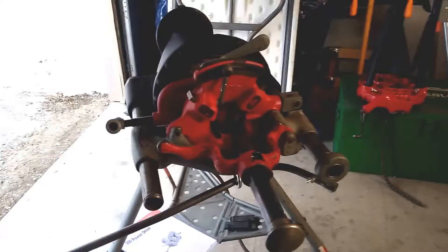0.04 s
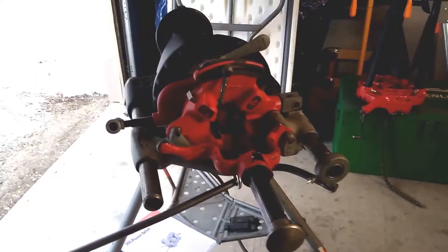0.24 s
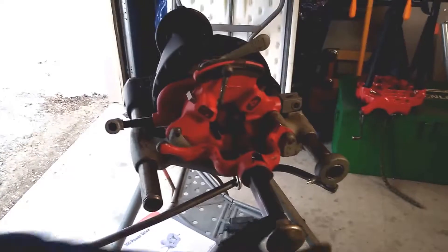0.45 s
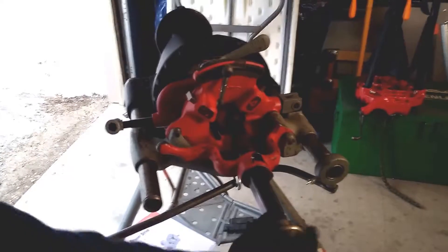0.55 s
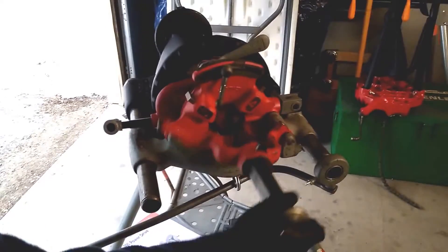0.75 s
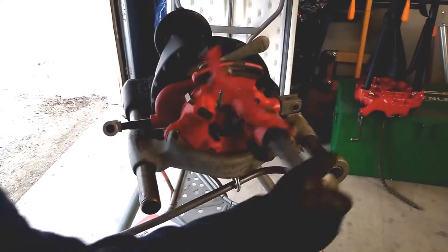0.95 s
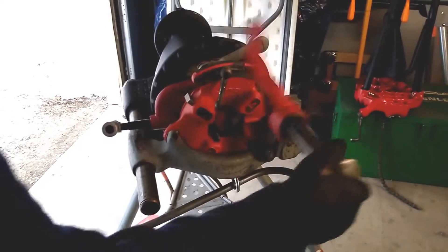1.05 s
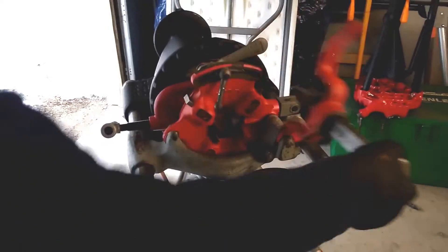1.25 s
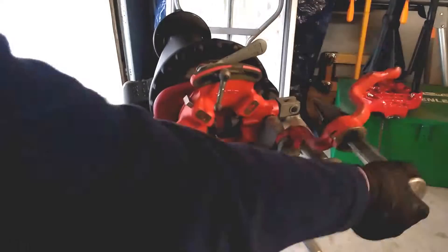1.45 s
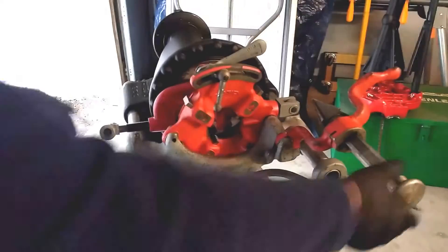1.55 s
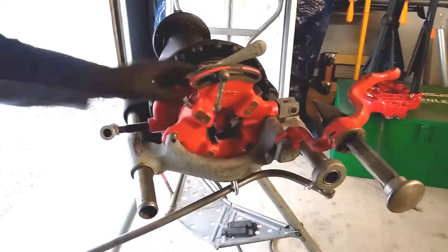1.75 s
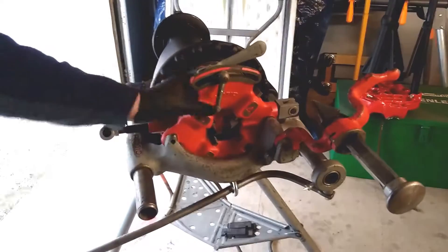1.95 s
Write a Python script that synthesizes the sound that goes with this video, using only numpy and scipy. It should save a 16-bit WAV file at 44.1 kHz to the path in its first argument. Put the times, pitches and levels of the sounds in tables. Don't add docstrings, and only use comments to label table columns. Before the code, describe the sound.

A heavy steel tool arm clanks onto its stop at 1.33 s, chattering and ringing brightly. Before it, soft far rumble and low air noise fade up, a sleeve rustles at 0.2 s, and a latch knocks open at 0.63 s, settling at 0.7 s. A quick scrape comes at 1.28 s. Loose steel ticks at 1.49 s; automatic gain ducks everything, then cloth rustles near 1.8 s in the open workshop.

```python
import sys
import numpy as np
from scipy import signal
from scipy.fft import rfft, irfft, next_fast_len
from scipy.io import wavfile

SR = 44100
rng = np.random.default_rng(int(sys.argv[2]) if len(sys.argv) > 2 else 0)


def log_audio(samples):
    frames = np.atleast_2d(samples).T
    limited = np.clip(frames, -1, 1)
    pcm = np.round(limited * 32767).astype(np.int16)
    wavfile.write(sys.argv[1], SR, pcm)


def decibels_to_gain(level_db):
    exponent = np.asarray(level_db, float) / 20
    return 10 ** exponent


N = 88200


def rms_one(x):
    return x / np.sqrt(np.mean(x ** 2) + 1e-20)


def at_hz(points, hz):
    table_hz, values = np.array(points)[:, 0], np.array(points)[:, 1]
    return np.interp(np.log(hz), np.log(table_hz), values)


def drift(rate_hz):
    r = np.exp(-80 * np.pi * rate_hz / SR)
    white = rng.standard_normal(N // 40 + 2002)
    slow = signal.lfilter([1], [1, -2 * r, r * r], white)[2000:]
    return np.interp(np.arange(N) / 40, np.arange(len(slow)), rms_one(slow))


def late(x, lag):
    size = next_fast_len(N + 256)
    turn = np.exp(-2j * np.pi * np.arange(size // 2 + 1) * lag / size)
    return irfft(rfft(x, size) * turn, size)[..., :N]


def ports(rows, directions):
    total = 0
    for x, (lag, db) in zip(rows, directions):
        total = total + decibels_to_gain(db) * np.array([late(x, lag / 2), late(x, -lag / 2)])
    return total


def ring(clicks, hz, t60):
    r = decibels_to_gain(-60 / (max(t60, .01) * SR))
    w = 2 * np.pi * hz / SR
    return signal.lfilter([0, np.sin(w)], [1, -2 * r * np.cos(w), r * r], clicks + 1e-18)


BAND_EDGES = 30 * 2 ** np.arange(0, 9.3, .4)


def bands(length):
    white = rng.standard_normal((2, 4, length))
    for k, (low, high) in enumerate(zip(BAND_EDGES, BAND_EDGES[1:])):
        band = signal.butter(2, [low, high], "band", fs=SR, output="sos")
        yield np.sqrt(low * high), signal.sosfilt(band, white[k % 2])


def patchy(spectrum, patchy_db, flicker_hz):
    together = drift(flicker_hz)
    total = 0
    for hz, noise in bands(N):
        flicker_db = patchy_db * (0.5 * together + drift(flicker_hz))
        total = total + decibels_to_gain(at_hz(spectrum, hz) + flicker_db) * noise
    return rms_one(total)


# (left port lag [samples], level [dB])
AROUND = [(13.5, -0.5), (3, -8), (-2, -0.5), (-11.5, -5)]
# (frequency [Hz], level per Hz [dB])
RUMBLE_COLOUR = [(40, -35), (110, 5.5), (200, 1.5), (380, 0), (620, -1.5), (1900, -9.5), (4500, -32.5),
                 (12000, -36.5)]
# (time [s], level [dB])
DRONE_SWELLS = [
    (0, -30.5),
    (.2, -36),
    (.35, -33),
    (.6, -39),
    (.73, -32),
    (.9, -37.5),
    (1.08, -25.5),
    (1.2, -52),
    (1.8, -35.5),
    (1.95, -31.5),
]


def rumble():
    rumble_db, drone_hz, wander_hz = -33.5, 191.3, 3.7
    s, db = np.transpose(DRONE_SWELLS)
    swell = decibels_to_gain(np.interp(np.arange(N) / SR, s, db))
    phase = 2 * np.pi * np.cumsum(drone_hz + wander_hz * drift(6)) / SR
    drone = swell * np.sin(phase)
    far = decibels_to_gain(rumble_db) * patchy(RUMBLE_COLOUR, patchy_db=1.44, flicker_hz=30)
    return ports(far, AROUND) + ports([drone], AROUND[:1])


def port_wind():
    low_pass = signal.butter(2, 280, fs=SR, output="sos")
    air = rms_one(signal.sosfilt(low_pass, rng.standard_normal((2, N))))
    return decibels_to_gain(-38.5 + 1.16 * drift(16.4)) * air


# (pitch [Hz], t60 [s], level [dB])
HOLLOW_TONES = [(129.6, 0.26, -40), (297.4, 0.14, -39), (376.5, 0.18, -43.5), (526.7, 0.13, -45.5),
                (724.6, 0.18, -46)]


def hollow():
    total = 0
    for hz, t60, db in HOLLOW_TONES:
        total = total + decibels_to_gain(db) * rms_one(ring(rng.standard_normal((2, N)), hz, t60))
    return ports(total, AROUND[:2])


# (frequency [Hz], level per Hz [dB])
CLOTH_COLOUR = [(800, -30), (2500, 8), (3800, 7.5), (5500, -9.5), (9000, 1), (15000, -2)]
# (start [s], rise [s], decay [s], level [dB], extra level of the low part [dB])
RUSTLES = [
    (0.189, 0.041, 0.063, -46.5, 3),
    (.485, 0.018, 0.041, -51, -24),
    (.72, 0.026, 0.038, -52, -7),
    (.99, 0.018, 0.099, -58, 12.5),
    (1.778, 0.022, 0.091, -44, -6),
    (1.9, .015, .05, -49, -1),
]


def sleeve():
    split_hz = 5700
    t = np.arange(N) / SR
    hiss = patchy(CLOTH_COLOUR, patchy_db=1.5, flicker_hz=35)
    low = signal.sosfilt(signal.butter(4, split_hz, "low", fs=SR, output="sos"), hiss)
    high = signal.sosfilt(signal.butter(4, split_hz, "high", fs=SR, output="sos"), hiss)
    swishes = 0
    for s, rise, fall, db, low_db in RUSTLES:
        rising = np.clip((t - s) / rise, 0, 1) ** 2
        falling = np.exp(-np.maximum(t - s - rise, 0) / fall)
        swishes = swishes + decibels_to_gain(db) * rising * falling * (high + decibels_to_gain(low_db) * low)
    return ports(swishes, AROUND)


# (time [s], level [dB], pitch [Hz], t60 [s])
TICKS = [
    (.24, -41.5, 3900, .05),
    (.567, -37.5, 3840, 0.021),
    (.838, -47, 3600, 0.037),
    (1.004, -47, 3494, 0.073),
    (1.488, -25, 3810, 0.065),
]


def ticks():
    out = np.zeros(N)
    for s, db, hz, t60 in TICKS:
        clicks = np.zeros(N)
        bounce = np.arange(3)
        clicks[int(s * SR) + bounce * int(.0031 * SR)] = decibels_to_gain(db - 4 * bounce)
        out += ring(clicks, hz, t60) + 0.54 * ring(clicks, 0.96 * hz, t60)
    return ports([out], [(2.8, -1.2)])


# (left port lag [samples], level [dB])
BAY = [(10.5, -2), (5, 0), (-2.5, -2), (-12, -6.5)]
# (frequency [Hz], t60 [s])
BODY_T60 = [(200, 0.5), (600, 0.55), (1500, 0.41), (3700, 0.42), (10000, 0.3)]


def metal(contacts, pitches_hz, modes, body, modes_db, body_db, crack_db, lag, t60_share):
    treble_from_hz, crack_t60 = 3500, 0.011
    s, db, treble_db = np.transpose(contacts)
    at = (s * SR).astype(int)
    spread_db = rng.normal(0, 2.5, (len(s), len(modes)))

    def strength(hz):
        return decibels_to_gain(db + treble_db * hz ** 2 / (hz ** 2 + treble_from_hz ** 2))

    clear = 0
    for k, (hz, (level_db, t60)) in enumerate(zip(pitches_hz, modes)):
        clicks = np.zeros(N)
        clicks[at] = strength(hz) * decibels_to_gain(level_db + spread_db[:, k])
        clear = clear + ring(clicks, hz, t60)

    t = np.arange(SR // 3) / SR
    centres, rings = [], []
    for hz, noise in bands(len(t)):
        tail = decibels_to_gain(-60 * t / (t60_share * at_hz(BODY_T60, hz)))
        crack = decibels_to_gain(crack_db - 60 * t / crack_t60)
        centres.append(hz)
        rings.append(noise * decibels_to_gain(at_hz(body, hz)) * (tail + crack))
    rings = np.array(rings)

    dense = np.zeros((4, N + SR))
    gains_by_contact = np.transpose([strength(hz) for hz in centres])
    for k, gains in enumerate(gains_by_contact):
        dense[:, at[k]:at[k] + len(t)] += np.roll(np.tensordot(gains, rings, 1), k, axis=0)
    return ports([clear], [(lag, modes_db)]) + decibels_to_gain(body_db) * ports(dense[:, :N], BAY)


# (time [s], level [dB], extra treble [dB])
LATCH_KNOCKS = [
    (.6245, -20, 2),
    (.6278, -16, -19),
    (.634, -33, -19),
    (.701, -27.5, -19),
    (.744, -41, -3),
]
LATCH_HZ = [370, 730, 1007, 1500, 1935, 3290, 3585, 3970, 4350]
# (level [dB], t60 [s])
LATCH_MODES = [(0, 0.17), (-9.5, 0.079), (1, 0.19), (-9.5, 0.038), (-3.5, 0.075), (-15.5, .1), (-10, 0.19),
               (-19, 0.091), (-10.5, 0.071)]
# (frequency [Hz], level per Hz [dB])
LATCH_BODY = [(100, 2.5), (400, -2.5), (1000, -0.5), (2200, -4), (3600, -1.5), (5500, -11.5), (9000, -36),
              (15000, -53)]


def latch_opens():
    return metal(LATCH_KNOCKS, LATCH_HZ, LATCH_MODES, LATCH_BODY, modes_db=-6, body_db=0.0, crack_db=10.5,
                 lag=1.8, t60_share=0.76)


# (time [s], level [dB], extra treble [dB])
BRUSH_SCRAPES = [
    (1.2815, -26, -18),
    (1.285, -27.5, 4.5),
    (1.2885, -22.5, -12),
    (1.291, -36.5, -6),
    (1.2965, -23.5, -2.5),
    (1.304, -27.5, -17),
]
# (frequency [Hz], level per Hz [dB])
BRUSH_BODY = [(100, 2), (400, -0.5), (1000, -0.5), (2000, -7.5), (3600, -5.5), (5500, -37), (9000, -36),
              (15000, -33)]


def arm_brushes():
    return metal(BRUSH_SCRAPES, LATCH_HZ, LATCH_MODES, BRUSH_BODY, modes_db=-7.5, body_db=5.0, crack_db=9,
                 lag=1.6, t60_share=0.36)


# (time [s], level [dB], extra treble [dB])
CLANK_HITS = [(1.3268, -12, -10.5), (1.3295, -15, 4), (1.3318, -13.5, 4.5), (1.3345, -20.5, -14),
              (1.337, -17.5, 8), (1.344, -20, -7), (1.352, -29, 6.5), (1.385, -18, 3.5), (1.397, -31, -15),
              (1.425, -43, -10), (1.488, -27, -2)]
ARM_HZ = [760, 975, 1222, 1317, 1940, 2570, 2966, 3490, 3740, 3885, 4307, 5530, 8270, 12450]
# (level [dB], t60 [s])
ARM_MODES = [(-18.5, 0.26), (-1.5, 0.083), (-25, 0.51), (2, 0.078), (-7.5, .12), (-0.5, 0.048), (-7.5, .5),
             (-6, 0.14), (-0.5, 0.1), (-0.5, 0.081), (-7, 0.15), (-11, 0.098), (-16, 0.21), (-4, .08)]
# (frequency [Hz], level per Hz [dB])
ARM_BODY = [(100, -15), (300, 0.5), (1000, 0), (2200, 0.5), (3500, 5.5), (5200, -2.5), (9000, -16.5),
            (15000, -16)]


def arm_drops():
    return metal(CLANK_HITS, ARM_HZ, ARM_MODES, ARM_BODY, modes_db=-10.5, body_db=-4.5, crack_db=9,
                 lag=3.57, t60_share=1.27)


def scene():
    background = rumble() + port_wind() + hollow()
    small_sounds = sleeve() + ticks()
    return background + small_sounds + latch_opens() + arm_brushes() + arm_drops()


def band_limit(x):
    return signal.sosfilt(signal.butter(12, 16620, fs=SR, output="sos"), x)


# (frequency [Hz], level [dB])
MIC = [(1700, -0.25), (2150, 4.5), (2600, 0.64), (5000, -1.5), (6300, -4), (8000, 1.5), (10000, 4.5),
       (15400, -5)]
# (time [s], level [dB])
GAIN = [
    (0, -14),
    (.09, -7.5),
    (.2, -1.5),
    (1.0, -1),
    (1.333, 0),
    (1.368, -8.5),
    (1.44, -14.5),
    (1.54, -15.5),
    (1.68, -16),
    (2, -12.5),
]


def record(dry):
    port_lag, cancel_share, left_db = 16.09, 0.61, -2.19
    smear_hz, low_cut_hz, top_cut_hz, limit = 5280, 166, 15480, .95
    bend = np.tan(np.pi * smear_hz / SR - np.pi / 4)
    other = signal.lfilter([bend, 1], [1, bend], late(dry[::-1], port_lag))
    aimed = (dry - cancel_share * other) * decibels_to_gain(np.array([[left_db], [0]]))
    aimed = signal.sosfilt(signal.butter(2, low_cut_hz, "high", fs=SR, output="sos"), aimed)
    aimed = signal.sosfilt(signal.ellip(8, .5, 35, top_cut_hz, fs=SR, output="sos"), aimed)
    hz = np.arange(N // 2 + 1) * SR / N + 1
    aimed = irfft(rfft(aimed) * decibels_to_gain(at_hz(MIC, hz)), N)
    s, db = np.transpose(GAIN)
    gain = decibels_to_gain(np.interp(np.arange(N) / SR, s, db))
    mix = limit * np.tanh(aimed * gain / limit)
    return band_limit(mix)


dry = scene()
out = record(dry)
log_audio(out)
```